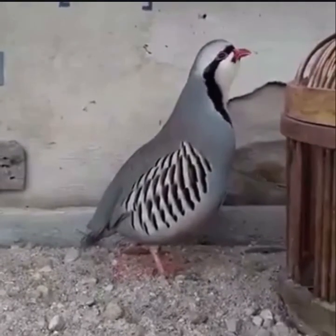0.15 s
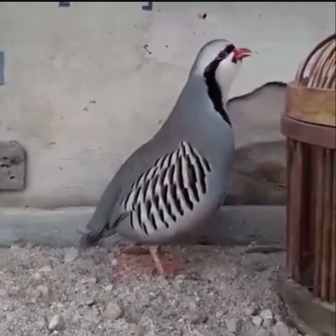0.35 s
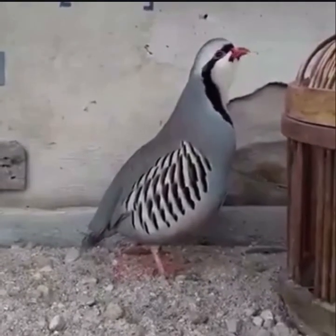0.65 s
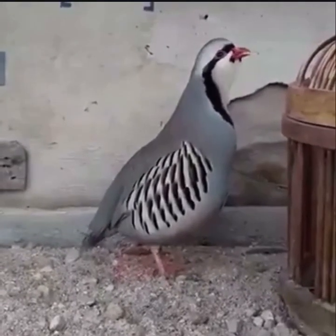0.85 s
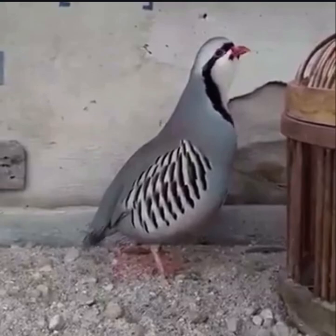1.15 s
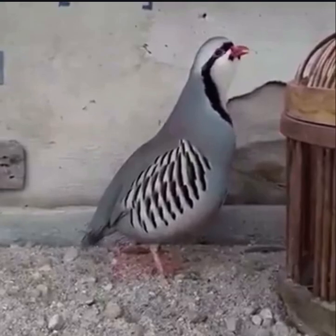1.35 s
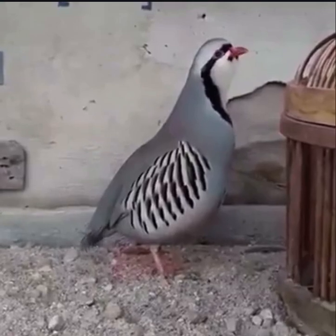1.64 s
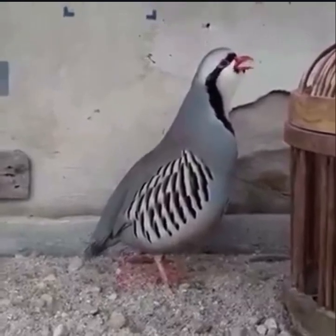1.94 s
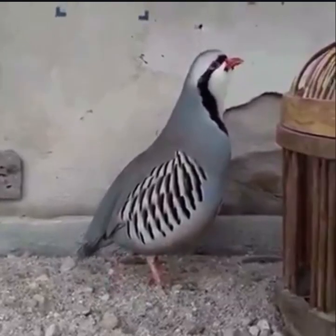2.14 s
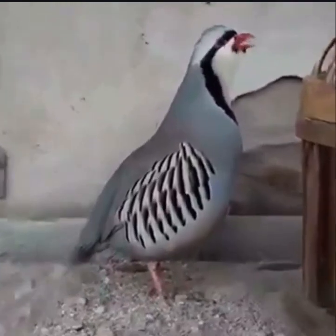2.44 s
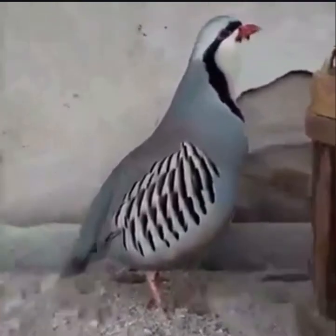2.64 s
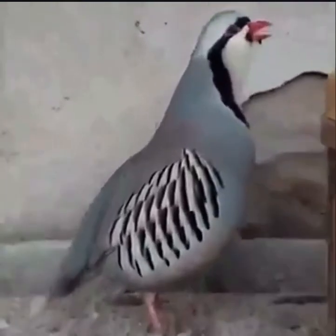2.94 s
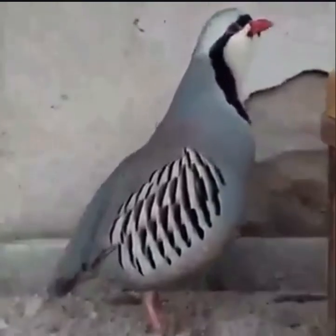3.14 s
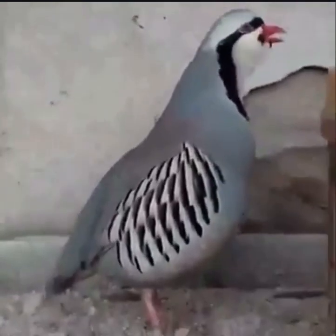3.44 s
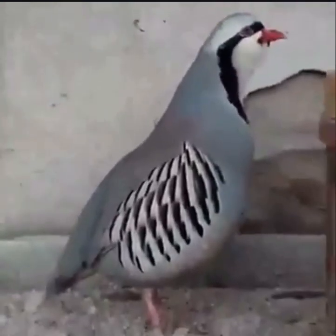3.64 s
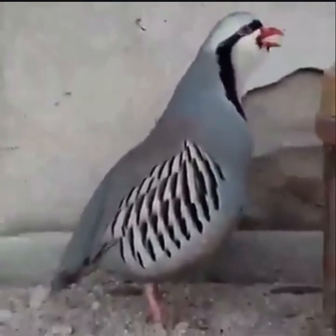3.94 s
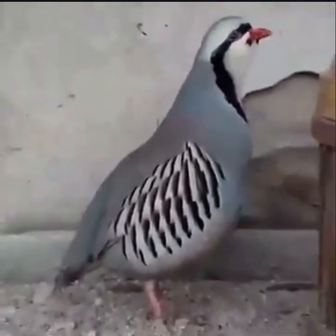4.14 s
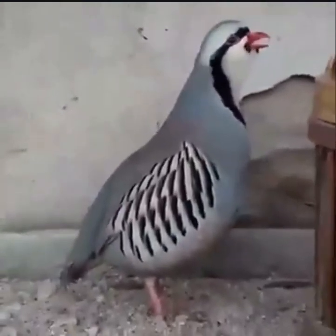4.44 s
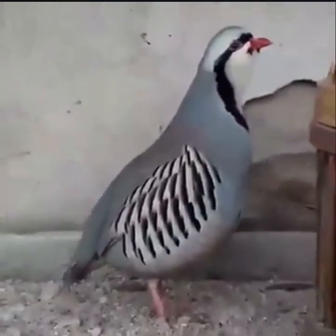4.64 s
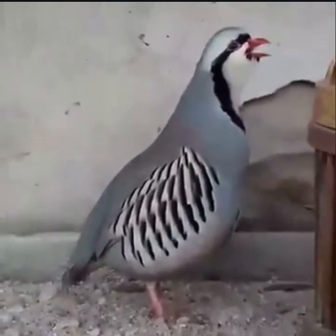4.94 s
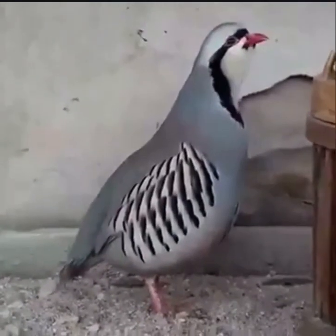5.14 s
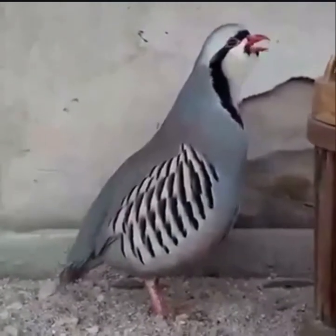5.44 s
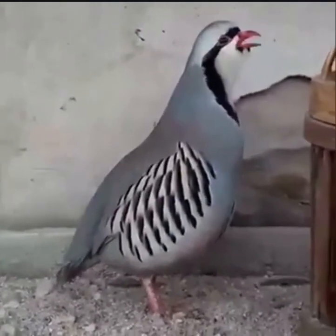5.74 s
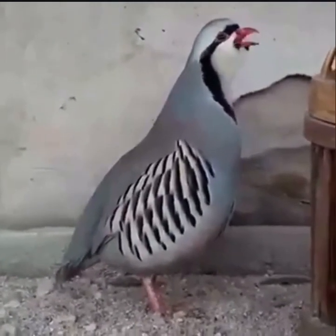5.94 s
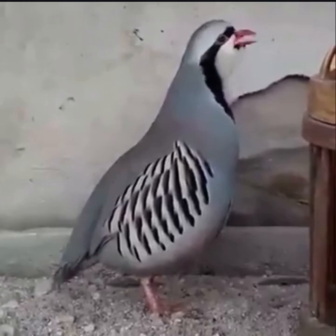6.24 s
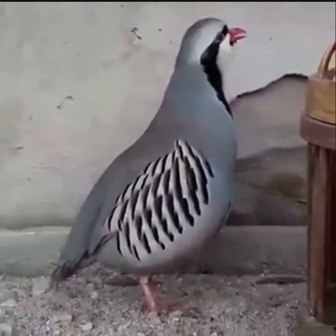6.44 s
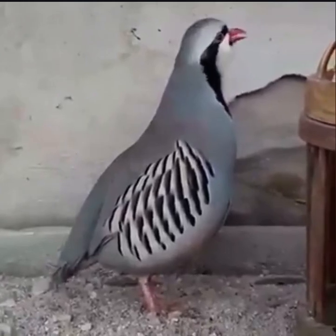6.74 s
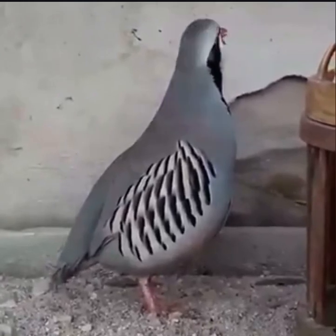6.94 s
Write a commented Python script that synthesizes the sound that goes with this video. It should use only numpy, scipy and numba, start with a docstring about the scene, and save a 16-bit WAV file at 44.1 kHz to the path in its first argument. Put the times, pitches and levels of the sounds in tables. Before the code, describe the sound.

A loud game bird cackles in an unbroken galloping rhythm: a strong bark, a quick cluck, then a slightly drawn-out scratchy note, a tiny gap, and again. Each note drops in pitch as it ends and carries a dry breathy rasp. The later calls sit slightly lower. The close, single-channel sound has near-wall reflections, a light tail, and barely audible low hum and outdoor air.

```python
"""A partridge in a walled gravel yard repeats a three-syllable call about twice a second.
Uneven pulses of the syrinx excite a moving throat resonance, the pitch dropping a step within each note;
breath driven by the same pulses rasps and hisses through the windpipe resonances.
Near and far surfaces echo each note, feedback delays make the yard ring on, and a low outdoor murmur
of filtered noise with two faint wavering hums lies below."""
import sys
import numpy as np
from scipy import signal
from scipy.fft import rfft, irfft, next_fast_len
from scipy.io import wavfile
from numba import njit

SR = 44100
rng = np.random.default_rng(int(sys.argv[2]) if len(sys.argv) > 2 else 0)


def wav_record(signal):
    """Record a signal, one row per channel, as 16-bit PCM in the file named by sys.argv[1]."""
    frames = np.transpose(np.atleast_2d(signal))
    bounded = np.clip(frames, -1, 1)
    # unit amplitude maps onto the largest positive 16-bit level
    quanta = np.round(bounded * 32767).astype(np.int16)
    wavfile.write(sys.argv[1], SR, quanta)


N = 312228
LEAD = 4096   # samples of room for sound before time zero


def partridge():
    """Superposition: the notes add in time, taking the three syllables in turn."""
    # Each row: start in seconds, length in seconds, voice level in dB and rasp level in dB before the
    # syllable's contour, first pitch in Hz before its bend.
    call_notes = [(-0.036, 0.064, -10, -23, 481.9), (0.125, 0.049, -13, -20, 480),
                  (0.238, 0.084, -14, -20.5, 477), (0.455, 0.065, -10, -19.5, 481.2),
                  (0.622, 0.046, -12.5, -18, 498), (0.732, 0.082, -14, -19, 494),
                  (0.951, 0.064, -8, -18.5, 474.5), (1.113, 0.05, -12.5, -18.5, 484.4),
                  (1.227, 0.08, -14.5, -19.5, 408), (1.446, 0.064, -8, -20, 477.3),
                  (1.609, 0.05, -12.5, -19, 492), (1.723, 0.081, -13, -18, 488.6),
                  (1.945, 0.068, -8, -19, 461.5), (2.107, 0.051, -12.5, -21, 489),
                  (2.222, 0.078, -14, -17.5, 477.8), (2.441, 0.065, -7, -17.5, 463.3),
                  (2.613, 0.045, -11.5, -18, 486), (2.723, 0.078, -15, -18, 498),
                  (2.942, 0.068, -8, -18.5, 469.2), (3.107, 0.05, -13, -19.5, 506),
                  (3.221, 0.074, -14.5, -17, 495.7), (3.439, 0.068, -10, -21.5, 466),
                  (3.611, 0.049, -12.5, -19, 488), (3.726, 0.075, -15.5, -18.5, 458.4),
                  (3.949, 0.064, -9, -20, 444.6), (4.116, 0.044, -13.5, -19, 475.5),
                  (4.234, 0.061, -13.5, -22, 417), (4.448, 0.06, -8.5, -20.5, 442.4),
                  (4.614, 0.048, -15, -23, 455.2), (4.732, 0.07, -13.5, -20, 422.6),
                  (4.954, 0.062, -8.5, -19, 445.4), (5.115, 0.044, -14, -20, 465),
                  (5.234, 0.068, -14, -21, 419), (5.447, 0.066, -9, -21.5, 410.8),
                  (5.624, 0.048, -13.5, -19, 489.4), (5.744, 0.067, -13.5, -16.5, 427),
                  (5.956, 0.062, -8.5, -17.5, 445.4), (6.125, 0.044, -12.5, -18.5, 470.7),
                  (6.247, 0.065, -13, -20, 424.7), (6.475, 0.067, -10.5, -22, 427),
                  (6.643, 0.044, -14, -21.5, 449.6), (6.762, 0.069, -14, -20.5, 423.7),
                  (6.994, 0.06, -8.5, -20.5, 448.3)]
    # Three syllables, each a contour. Each row: share of the note's length, voice level in dB, rasp level
    # in dB, factor on the throat resonance, factor on the pitch, roughness (limited to 0-1).
    contours = [
        [(-.08, -37, -18.5, 1.4, 1.4, 0.68), (.08, -14, 0, 1.28, 1.14, 0.95), (.38, 2.25, 8, 1.04, 1.01, 0.19),
         (.8, -1, -4, 0.99, 1.14, 0.36), (1.05, -9.5, -25.5, 1.01, 0.72, 0.47),
         (1.25, -44, -45, 0.99, 1.21, 0.46)],
        [(-.2, -21, -24.5, 1, 1.24, 0.9), (.12, -1, -2.5, 0.99, 1.14, 0.44), (.48, 2.5, 5, 1, 0.93, 0.17),
         (.75, -3.5, -3.5, 0.91, 1.11, 0.27), (1.05, -9, -9.5, 0.54, 0.98, 0.35),
         (1.3, -90, -44, 0.56, 0.83, 0.37)],
        [(-.18, -29, -40, 0.61, 0.96, 0.86), (-.04, -6, -13, 0.72, 1.1, 0.95),
         (.1, -7.5, -2.5, 0.98, 1.12, 0.67), (.4, 0.5, 2, 1.06, 1.03, 0.53), (.65, 3.5, 0.5, 1.16, 1.004, 0.27),
         (.88, 0.6, -8.5, 0.96, 1.04, 0.34), (1.08, -14, -39, 1.44, 0.61, 0.3)],
    ]
    # Each row, one per syllable: throat resonance in Hz before its factor, last pitch in Hz before its bend,
    # share of the note at mid-drop, fundamental level in dB, low rasp in dB against the rasp,
    # high hiss in dB against the rasp before its fade, swell in dB per note length.
    syllable_settings = [(1197.6, 380, .62, -30.5, -12.5, -11.5, 2), (927, 386, .7, -24, -10, -10, 1.5),
                         (1090, 378, .65, -31.5, -8.5, -10.5, 3.5)]
    out = np.zeros(LEAD + N + SR)
    for k, row in enumerate(call_notes):
        start, sound = note(row, syllable_settings[k % 3], contours[k % 3])
        at = LEAD + round(row[0] * SR) if start is None else LEAD + round(start * SR)
        out[at:at + len(sound)] += sound
    return out[:LEAD + N]


def note(row, setting, contour):
    """Source and filter: syrinx pulses feed throat and windpipe; returns the start time of the samples, lead-in
    included, and the samples."""
    start, length, voice_db, rasp_db, first_hz = row
    throat_hz, last_hz, drop, fundamental_db, low_db, hiss_db, swell_db = setting
    columns = np.transpose(contour)
    share = np.arange(columns[0, 0], columns[0, -1], 1 / (length * SR))
    voice_shape, rasp_shape, opening, bend, rough = [
        np.interp(share, columns[0], column) for column in columns[1:]]
    rough = np.clip(rough, 0, 1)
    pitch = bend * np.interp(share, [drop - .09, drop + .09], [first_hz, last_hz])   # one step
    cycle, pulses, puffs, turbulence = syrinx(pitch, rough)

    voice = throat(pulses + .3 * rough * puffs, throat_hz * opening)
    voice = voice * from_db(voice_db + voice_shape + swell_db * (share - .5))
    # the fundamental is nearly a sine, flatter in level than the throat band and weak while the voice is rough
    fundamental = np.sin(2 * np.pi * cycle) * (1.3 - rough)
    fundamental = fundamental * from_db(fundamental_db + 0.3 * voice_shape)
    breath = rasping_breath(pulses, puffs, turbulence, low_db, hiss_db, start)
    breath = breath * from_db(rasp_db + rasp_shape + breath_flutter(len(share)))
    return start + columns[0, 0] * length, voice + fundamental + breath


def syrinx(pitch, rough):
    """Self-oscillating valve: a pulse at each closure and a decaying puff of turbulence in each cycle."""
    chance = rng.standard_normal((128, 3))   # per cycle: timing, pulse strength, puff strength
    steady = np.cumsum(pitch) / SR + chance[0, 2] % 1
    index = steady.astype(int)
    jitter = .13 * rough * np.interp(steady, np.arange(128), chance[:, 0])   # in cycles
    cycle = np.maximum.accumulate(steady + jitter + 1)
    closures = np.diff(np.floor(cycle), prepend=np.floor(cycle[0]))
    # uneven closures, with every second one weaker when the voice is strained
    unevenness = .45 * rough * chance[index, 1]
    alternation = 1.2 * rough * (-1.) ** index
    pulses = rms_one(closures * (1 + unevenness + alternation))
    turbulence = rng.standard_normal(len(pitch))
    puffs = turbulence * np.exp(-1.5 * (cycle % 1))
    puffs = rms_one(puffs * from_db(0.83 * chance[index, 2]))
    return cycle, pulses, puffs, turbulence


def throat(source, centre_hz):
    """Resonant filtering: a moving throat mode less the crop's fixed mode; rms 1."""
    # Crop below the throat: centre in Hz, width of each of two passes in Hz, level in dB.
    crop_mode = (776, 980, -15)
    # widths of 150 and 533 Hz give a sharp top and steep skirts
    voice = resonate(resonate(source, centre_hz, 150.0, SR), centre_hz, 533.0, SR)
    voice = voice - fixed_mode(source, *crop_mode)
    # the windpipe has a deep trough above the throat band
    return rms_one(signal.sosfilt(signal.butter(6, 1650, fs=SR, output="sos"), voice))


def rasping_breath(pulses, puffs, turbulence, low_db, hiss_db, start):
    """Turbulent excitation of tube modes: rasp, low rasp and high hiss from three groups of resonances."""
    # Windpipe resonances that colour the breath. Each row of the three tables: centre in Hz before the
    # stretch, width of each of two passes in Hz, relative level in dB before the note's own variation.
    low_rasp_modes = [(2330, 300, -5), (2560, 220, 0), (3000, 550, -7)]
    rasp_modes = [(3480, 300, -4), (3900, 260, 0), (4250, 340, -5), (4700, 550, -14)]
    hiss_modes = [(6150, 910, 2), (7018, 520, 2.5), (8700, 3630, -10), (10420, 1860, -18),
                  (13240, 3100, -15)]
    hiss_fade_db_per_s = .5   # the treble dulls as the call goes on
    stretch = 1 + .03 * rng.standard_normal()
    breath = pulses + .5 * puffs
    rasp = windpipe(breath, rasp_modes, stretch)
    low_rasp = from_db(low_db) * windpipe(breath, low_rasp_modes, stretch)
    hiss = windpipe(0.12 * pulses + 0.23 * puffs + turbulence, hiss_modes, stretch)
    return rasp + low_rasp + from_db(hiss_db - hiss_fade_db_per_s * start) * hiss


def breath_flutter(length):
    """Amplitude modulation: the breath comes unevenly, its level in dB gliding between random gusts."""
    limit_db, gust_s = 4.0, 0.01097   # greatest deviation, time between gusts
    gusts = np.tanh(rng.standard_normal(128))
    return limit_db * np.interp(np.arange(length) / (gust_s * SR), np.arange(128), gusts)


def windpipe(breath, modes, stretch):
    """Sum of tube modes, shifted by the stretch of the neck and each note struck anew; rms 1."""
    strength_db = rng.normal(0, 1.12, len(modes))
    total = np.zeros(len(breath))
    for k, (hz, width_hz, level_db) in enumerate(modes):
        total += (-1) ** k * fixed_mode(breath, hz * stretch, width_hz, level_db + strength_db[k])
    return rms_one(total)


def fixed_mode(x, hz, width_hz, level_db):
    """Cascaded resonance at a fixed centre: two passes leave dark valleys between modes."""
    centre = np.full(len(x), float(hz))
    once = resonate(x, centre, float(width_hz), SR)
    return from_db(level_db) * resonate(once, centre, float(width_hz), SR)


@njit
def resonate(x, hz, width_hz, sr):
    """Damped oscillator: a two-pole resonance of peak gain 1, its centre moving sample by sample."""
    r = np.exp(-np.pi * width_hz / sr)
    y = np.zeros(len(x))
    for i in range(2, len(x)):
        drive = (1 - r * r) / 2 * (x[i] - x[i - 2])
        y[i] = drive + 2 * r * np.cos(2 * np.pi * hz[i] / sr) * y[i - 1] - r * r * y[i - 2]
    return y


def yard(x):
    """Reflection and reverberation: echoes, then ten feedback delays that grow duller each round."""
    # Ground and near wall. Each row: delay in seconds, gain in dB.
    near_echoes = [(.00523, -13), (.008, -11)]
    # Far wall. Each row: delay in seconds, gain in dB before the wall's treble loss.
    far_echoes = [(.05, -26.5), (0.075, -28), (.09, -22.5)]
    direct_db, tail_db = -3.5, -27.5
    t60_s, wall_cut_hz = 0.72, 2340   # decay time at the lowest frequencies, corner of the treble loss
    size = next_fast_len(len(x) + SR)
    hz = np.arange(size // 2 + 1) * SR / size

    def lag(s):
        """Pure delay: a phase falling linearly with frequency."""
        return np.exp(-2j * np.pi * hz * s)

    dull = 1 / (1 + 1j * hz / wall_cut_hz)
    near = 1 + sum(from_db(db) * lag(s) for s, db in near_echoes)
    far = sum(from_db(db) * lag(s) for s, db in far_echoes) * dull
    tail = 0
    for k, delay_s in enumerate(rng.uniform(.03, .075, 10)):
        loop = from_db(-60 * delay_s / t60_s) * lag(delay_s) * np.sqrt(dull)
        tail = tail + (-1) ** k * loop / (1 - loop)   # all rounds of one loop, summed
    response = near * (from_db(direct_db) + far + from_db(tail_db) * tail)
    return irfft(rfft(x, size) * response, size)[:len(x)]


def air():
    """Spectral shaping of white noise: a steady low murmur, with two hums as narrow-band noise."""
    # Murmur spectrum. Each row: frequency in Hz, relative density in dB per Hz.
    murmur_spectrum = [(30, -7), (110, 7), (220, 2), (400, -12), (1500, -27)]
    # Wavering low hums. Each row: centre in Hz, width of each of two passes in Hz, rms level in dB.
    hum_bands = [(51.5, 32, -66), (115, 13.5, -64.5)]
    hz = np.arange(1, N // 2 + 2) * SR / N
    points = np.transpose(murmur_spectrum)
    colour = from_db(np.interp(np.log(hz), np.log(points[0]), points[1]))
    murmur = rms_one(irfft(rfft(rng.standard_normal(N)) * colour, N))
    white = rng.standard_normal(N)
    hums = sum(from_db(db) * rms_one(fixed_mode(white, hum_hz, width_hz, 0))
               for hum_hz, width_hz, db in hum_bands)
    return from_db(-58) * murmur + hums


def from_db(db):
    """Logarithmic level: decibels to amplitude gain."""
    return 10 ** (np.asarray(db) / 20)


def rms_one(x):
    """Power normalisation: scale to rms 1."""
    return x / np.sqrt(np.mean(x ** 2) + 1e-20)


def scene():
    """Superposition of the bird in its yard and the air, as one channel."""
    return (yard(partridge())[LEAD:] + air())[None]


def record(dry):
    """Saturation and band limiting: the loudest peaks are rounded, the top is cut."""
    rounded = dry / (1 + (dry / .93) ** 4) ** (1 / 4)
    top_cut = signal.cheby2(16, 70, 14500, fs=SR, output="sos")   # 70 dB down from 14500 Hz
    return signal.sosfilt(top_cut, rounded)


dry = scene()
out = record(dry)
wav_record(out)
```